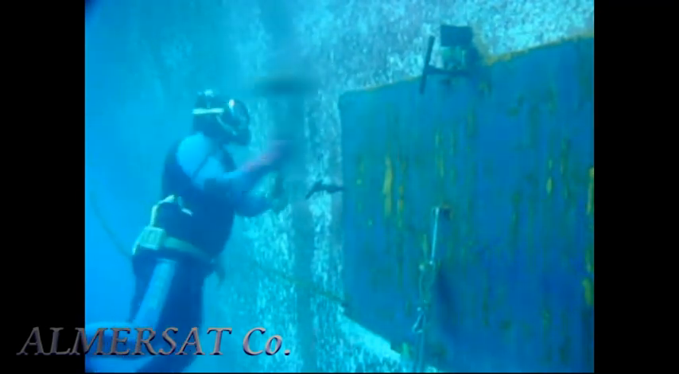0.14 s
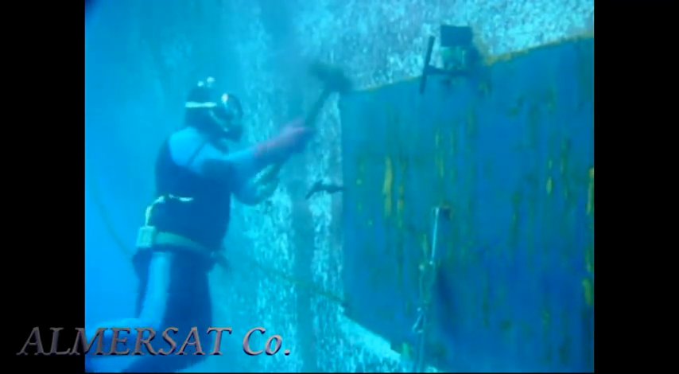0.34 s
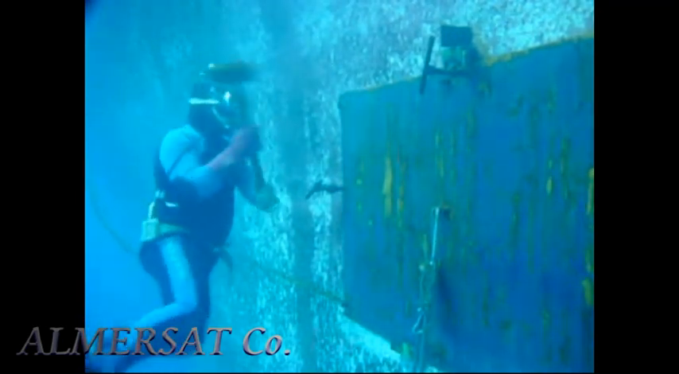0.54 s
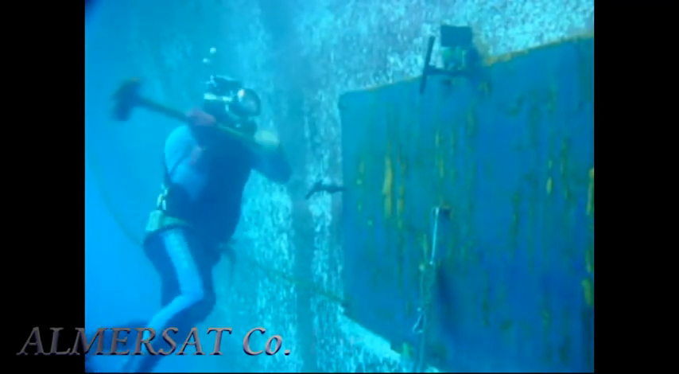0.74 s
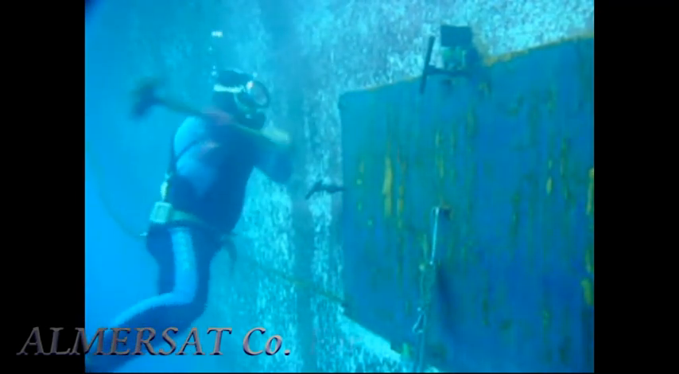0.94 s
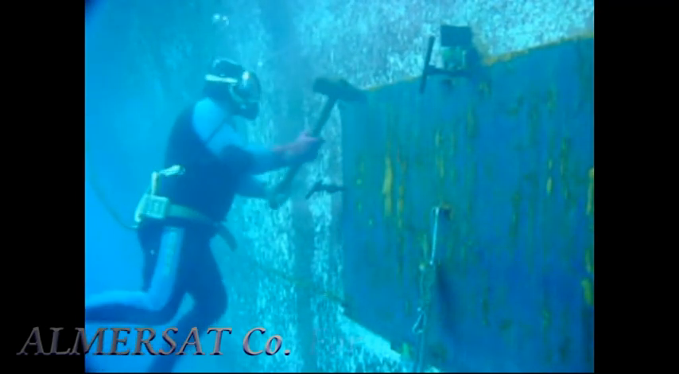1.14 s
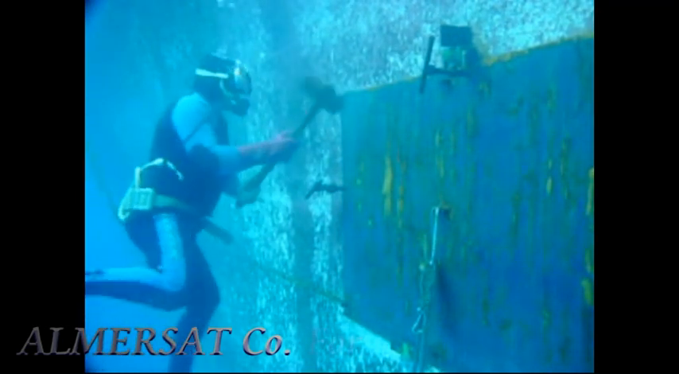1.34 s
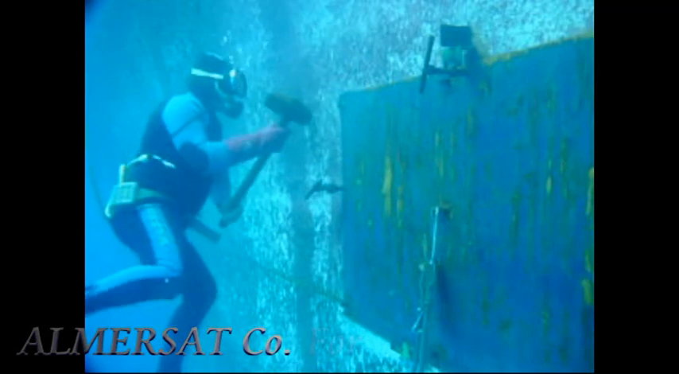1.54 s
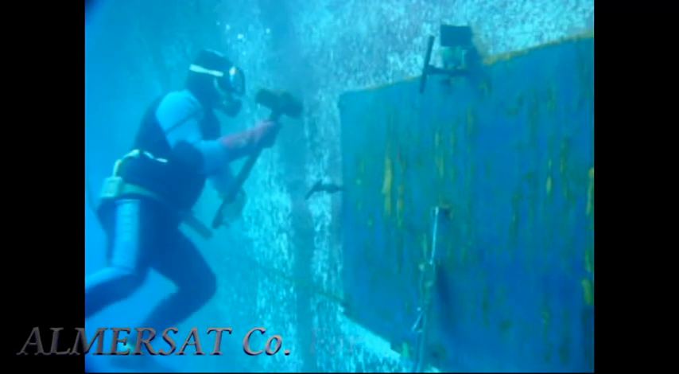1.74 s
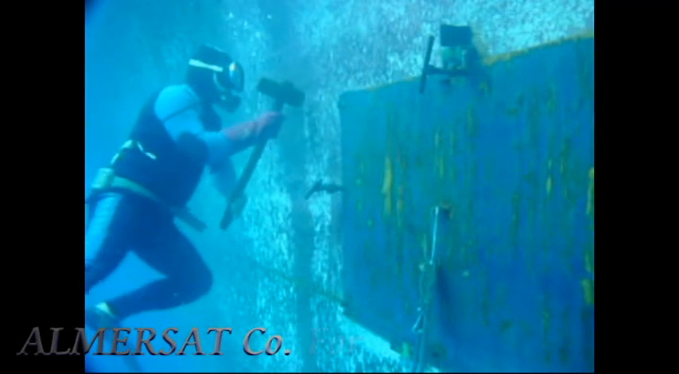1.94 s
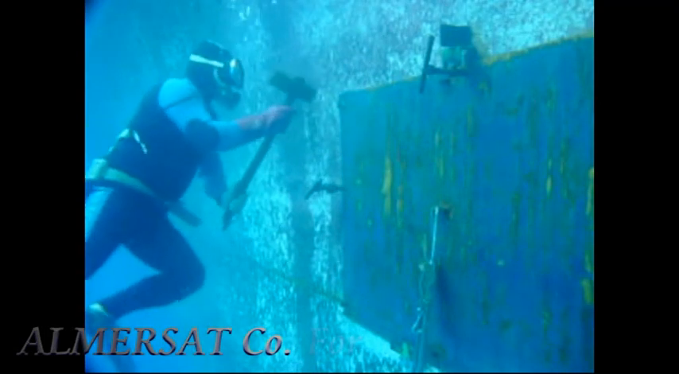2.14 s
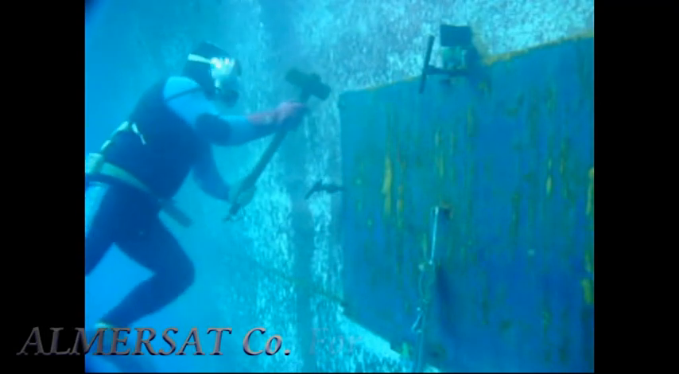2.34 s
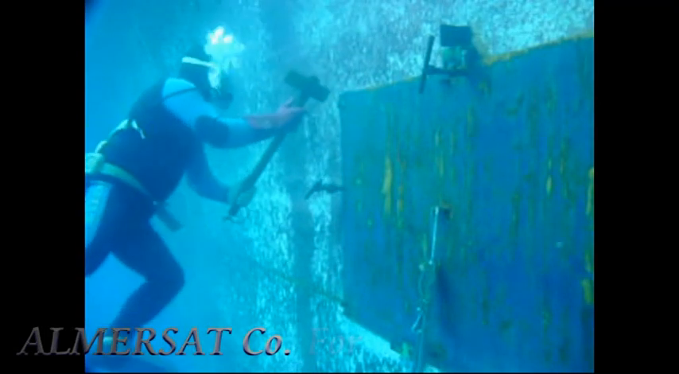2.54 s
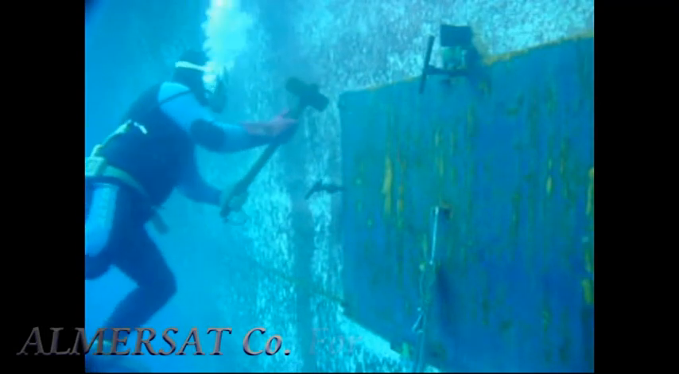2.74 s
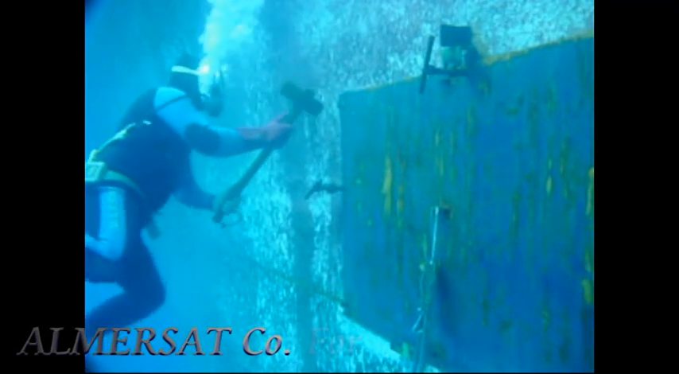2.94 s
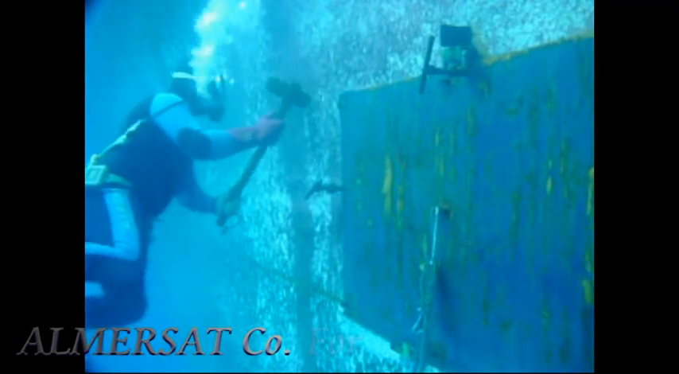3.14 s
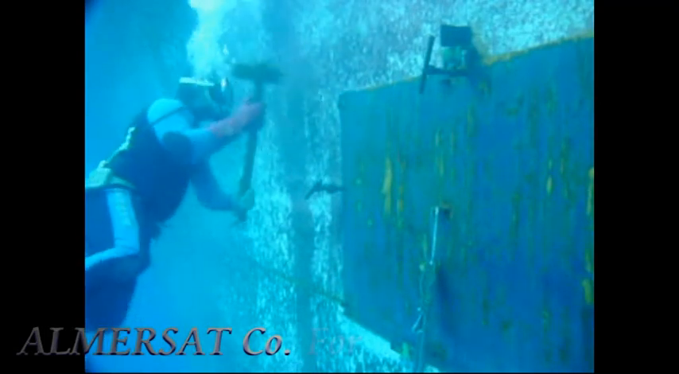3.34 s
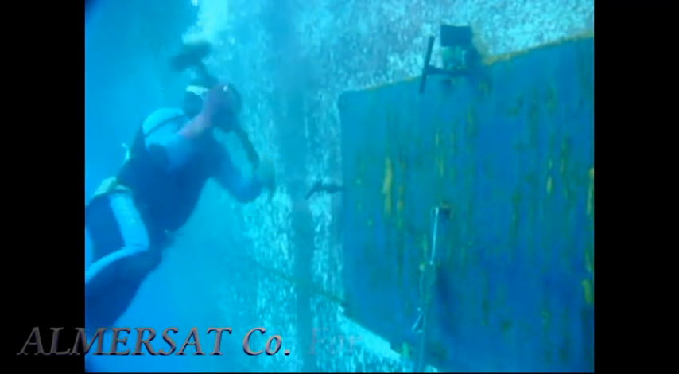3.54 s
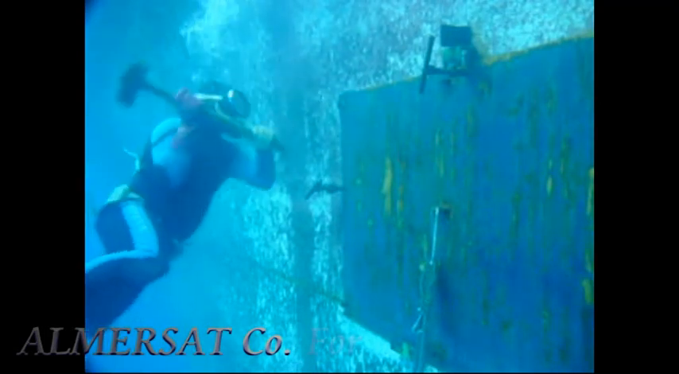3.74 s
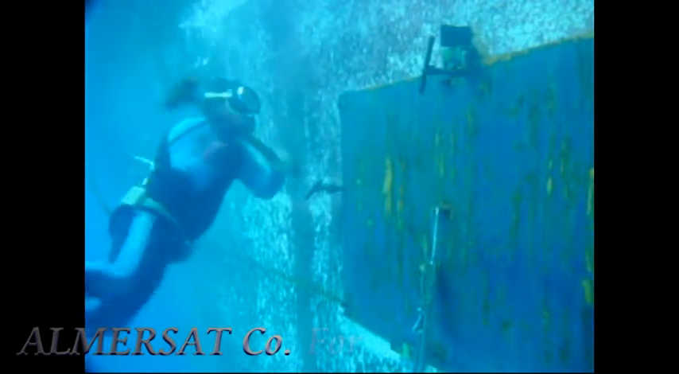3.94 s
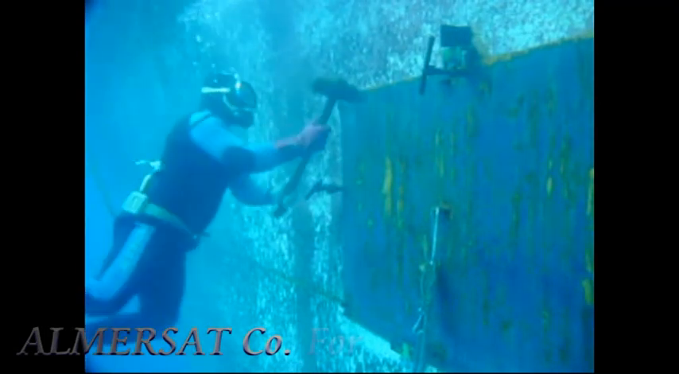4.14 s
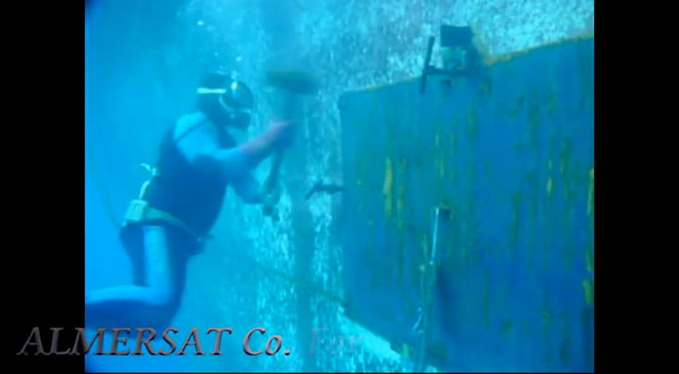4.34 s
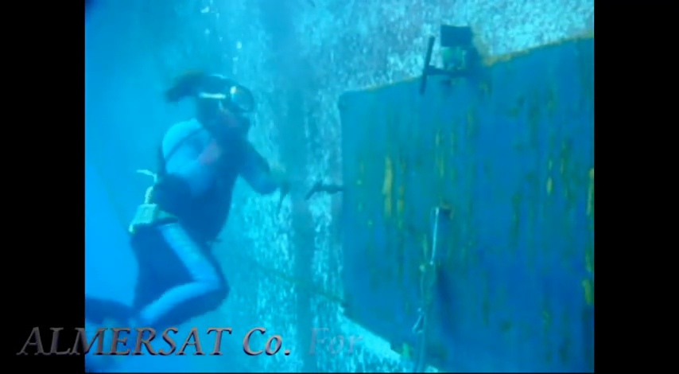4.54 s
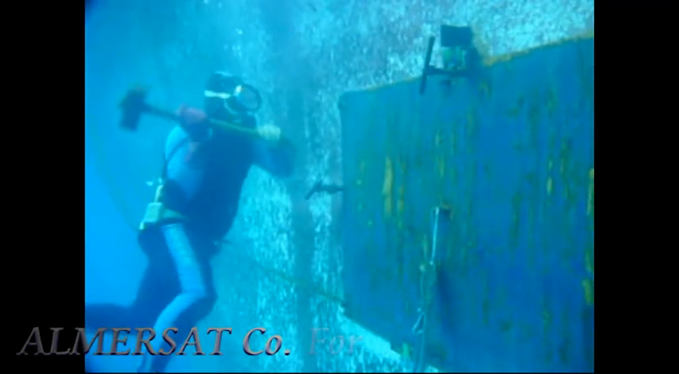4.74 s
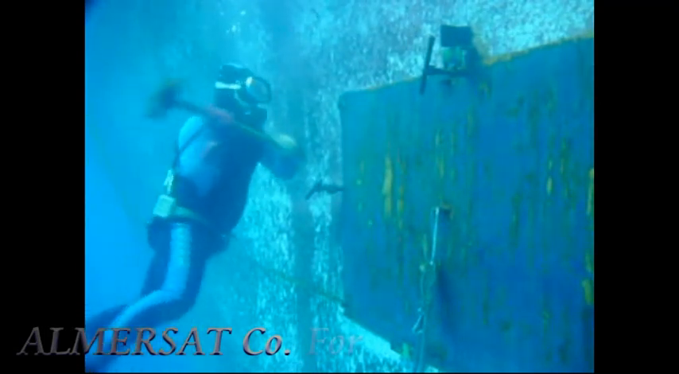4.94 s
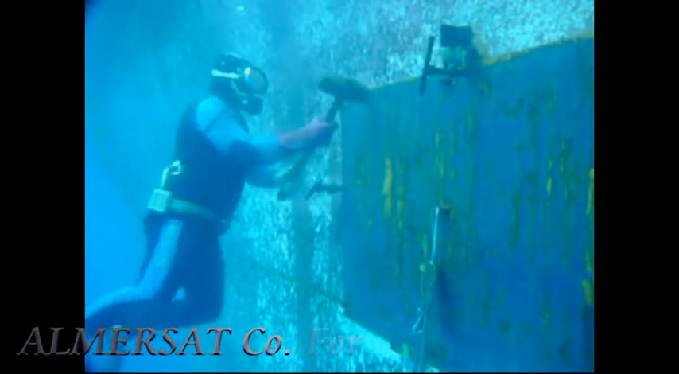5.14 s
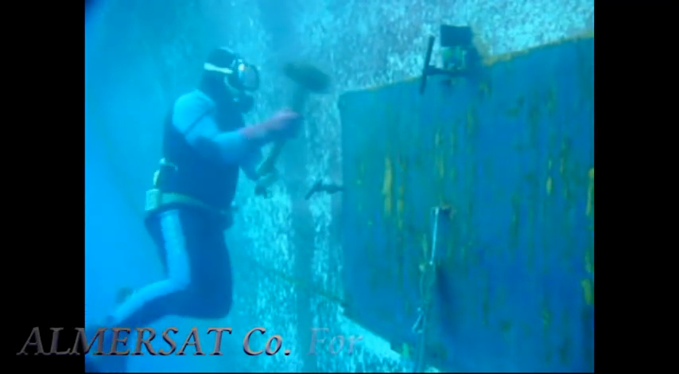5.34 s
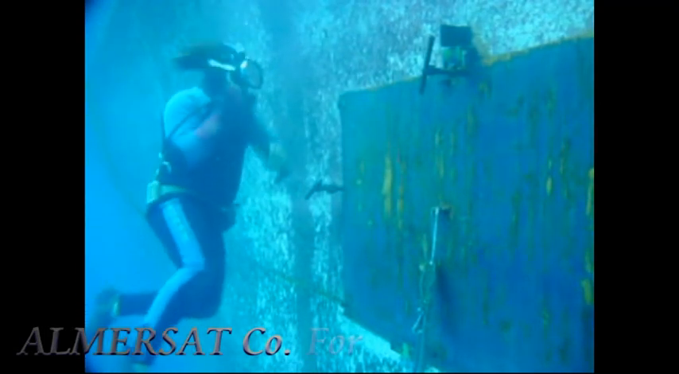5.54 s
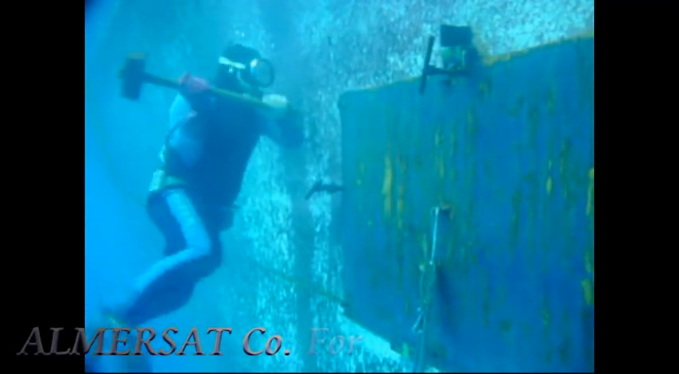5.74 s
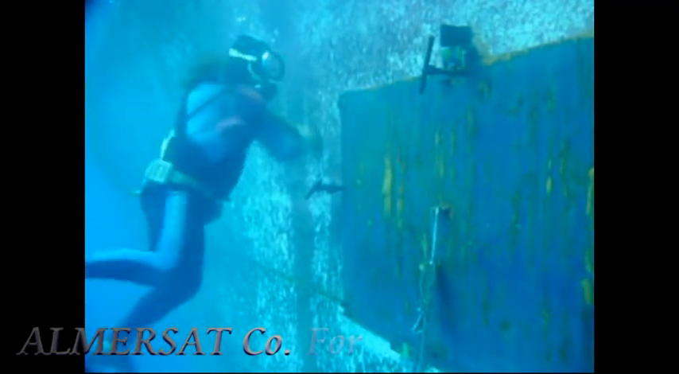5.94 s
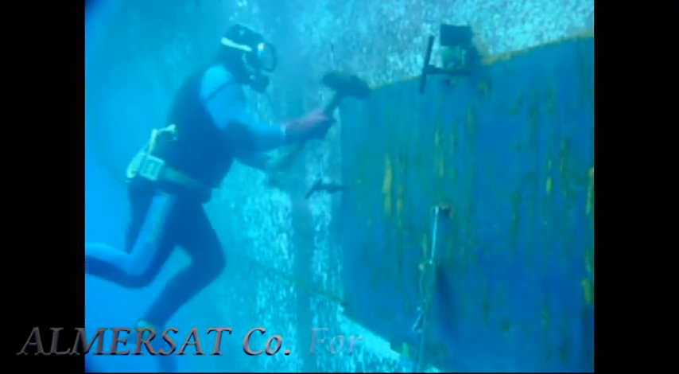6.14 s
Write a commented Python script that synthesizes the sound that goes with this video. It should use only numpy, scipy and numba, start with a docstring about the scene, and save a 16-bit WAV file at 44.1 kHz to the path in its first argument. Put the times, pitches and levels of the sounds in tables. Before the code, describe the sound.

A steady watery rush with small ringing bubbles is broken by five violent hammer blows on submerged steel: two early, then after a long gap three in quick succession. Each distorts into a harsh crack, then a muffled metallic ring and hull boom fade over a second or two. Faint little ticks come in between. The sound is close, narrow, nearly mono and boxed in by a camera housing.

```python
"""Under water at a ship's hull, a diver swings a sledgehammer five times against a steel plate over a rush of water.
Each blow sums a low push, a noisy contact crack, decaying plate modes, a high shimmer and the hull's noisy boom.
The rush is shaped noise, ringing bubbles and faint tones; two small ticks are short noise bursts.
Noises take the colour of a watertight housing. The blows overload the input until the gain control ducks;
as the boom dies, the gain and the rush come back."""
import sys
import numpy as np
from scipy import signal
from scipy.fft import rfft, irfft, next_fast_len
from scipy.io import wavfile
from scipy.ndimage import uniform_filter1d, map_coordinates
from numba import njit

SR = 44100
rng = np.random.default_rng(int(sys.argv[2]) if len(sys.argv) > 2 else 0)


def master_out(mix):
    """Clip the mix to full scale and print it as 16-bit PCM to the path in sys.argv[1]."""
    frames = np.transpose(np.atleast_2d(mix))
    ceiling = np.clip(frames, -1, 1)
    pcm = np.round(ceiling * 32767).astype(np.int16)
    wavfile.write(sys.argv[1], SR, pcm)


N = 277389


def amp(db):
    """Level law: decibels to an amplitude factor."""
    return 10 ** (np.asarray(db) / 20)


def unit(x):
    """Power normalisation: x scaled to rms 1."""
    return x / np.sqrt(np.mean(x ** 2) + 1e-20)


def along(points, hz):
    """Logarithmic frequency scale: (Hz, value) points interpolated on a log axis."""
    point_hz, value = np.transpose(points)
    return np.interp(np.log(hz + 1), np.log(point_hz + 1), value)


def wobble(rate):
    """Band-limited random modulation: a smooth curve through rate random knots a second."""
    knots = rng.standard_normal(N // 8)
    return map_coordinates(knots, [np.arange(N) * rate / SR], mode="wrap")


def filtered(x, response):
    """Linear filtering: the spectrum of x times a response of frequency."""
    m = next_fast_len(N + SR // 2)
    hz = np.fft.rfftfreq(m, 1 / SR)
    return irfft(rfft(x, m) * response(hz), m)[..., :N]


def housed_noise(spectrum):
    """Source and filter: noise of a given spectrum, coloured by the housing's resonances, at rms 1."""
    # Resonances and hollows of the housing.
    # Each row: centre in Hz, half-width in Hz, gain at the centre in dB.
    resonances = [(399.4, 13.4, 4), (535, 28.5, 5.5), (638, 18, -9.5), (747.5, 15, 3), (1285, 12, 6.5),
                  (1719, 48, -9), (2014, 27.4, 8.5), (2447, 74, 7.5), (3416, 52, 11), (3635, 71, 10),
                  (4450, 96, 8), (5060, 190, -7), (5480, 30, 8.5), (5890, 12, 11)]

    def response(hz):
        housing_db = sum(db / (1 + ((hz - centre) / width) ** 4) for centre, width, db in resonances)
        return amp(along(spectrum, hz) + housing_db)

    return unit(filtered(rng.standard_normal(N), response))


def bubbles(count=1300, centre_hz=680, spread=0.178, cycles=11, size_db=2.5, glide=0.04):
    """Bubble resonance: scattered bubbles of many sizes ring for a few cycles as their pitch rises; rms 1."""
    t = np.arange(SR // 20) / SR
    when, pitch, size = rng.random((count, 3)).T[:, :, None]
    pitch_offset = np.log(pitch / (1 - pitch)).clip(-3, 3) / 2
    hz = centre_hz * np.exp(spread * pitch_offset)
    age = t * hz / cycles  # 1 = faded by 20 dB
    strength_db = -size_db * np.log(1 - size).clip(-4)
    onset = 1 - np.exp(-t * hz)
    envelope = amp(strength_db - 20 * age) * onset
    grains = envelope * np.sin(2 * np.pi * hz * t * (1 + glide * age))
    at = (when * N).astype(int) + np.arange(len(t))
    return unit(np.bincount(at.ravel(), grains.ravel(), minlength=N)[:N])


def water(swell_db=-0.47, flutter_db=0.6, drift=1.0, gurgle_db=-7, rush_db=-1):
    """Superposition: broadband rush, bubbles and faint phase-wavering tones share one slowly growing level."""
    # Spectrum of the rush. Each row: frequency in Hz, density in dB per Hz.
    rush_spectrum = [(30, -47), (100, -37.5), (210, -30.5), (320, -11.5), (500, -8.5), (760, -1.5),
                     (900, -12), (1050, -16), (1500, -15), (1900, -21.5), (2900, -34), (4500, -34.5),
                     (5500, -36), (7400, -24)]
    # Faint tones in the rush. Each row: frequency in Hz, level in dB over the flow.
    tones = [(905, -16), (1282, -31)]
    start_db, rise_db_per_s = -19, 1.28
    t = np.arange(N) / SR
    flow_db = start_db + rise_db_per_s * t + swell_db * wobble(5.5) + flutter_db * wobble(45)
    hum = 0
    for hz, db in tones:
        phase = 2 * np.pi * hz * t + drift * wobble(9)  # drift in radians
        hum = hum + amp(db) * np.sqrt(2) * np.sin(phase)  # root two: sine of rms 1
    rush = amp(rush_db) * housed_noise(rush_spectrum)
    gurgle = amp(gurgle_db) * bubbles()
    return amp(flow_db) * (rush + gurgle + hum)


def ticks(t60=0.075):
    """Exponential decay: faint, bright little knocks, each a noise burst losing 60 dB in t60 seconds."""
    # Each row: start in seconds, level in dB.
    knocks = [(2.045, -25.5), (5.729, -22)]
    # Spectrum of a knock. Each row: frequency in Hz, density in dB per Hz.
    knock_spectrum = [(800, -16), (3500, 2), (5000, 1), (7400, -19)]
    t = np.arange(N) / SR
    envelope = sum((t >= s) * amp(db - 60 * np.abs(t - s) / t60) for s, db in knocks)
    return envelope * housed_noise(knock_spectrum)


def dying(x, decay):
    """Frequency-dependent damping: each frequency of x fades with its own decay time."""
    hz, t, z = signal.stft(x, SR, nperseg=1024)
    t60 = along(decay, hz)[:, None]
    return signal.istft(z * amp(-60 * t / t60), SR, nperseg=1024)[1][:N]


def plate(favoured_hz, lift_db, scatter_db=0.96, waver=0.58):
    """Modal superposition: damped modes of scattered strength; the water loading makes each waver in phase."""
    # Modes of the plate. Each row: frequency in Hz, relative level in dB, 60 dB decay time in seconds.
    modes = [(145.6, -23.5, 3.93), (248, -5.5, 1.85), (278.5, -12.5, 2.45), (325.5, -11.5, 3),
             (439, -10, 2.8), (535, -19, 3.46), (638, -4.5, 2.22), (668, 10, 0.88), (701, 20.5, 0.4),
             (817, -15.5, 3.1), (904, -2, 0.98), (1360, -15, 0.55), (1526, -12, 1.24)]
    t = np.arange(7 * SR // 2) / SR
    knots = np.arange(43) / 12  # twelve phase knots a second
    ring = np.zeros(len(t))
    favoured = np.argmin([abs(mode[0] - favoured_hz) for mode in modes])
    for k, (hz, db, t60) in enumerate(modes):
        start_phase = rng.uniform(0, 2 * np.pi)
        phase = start_phase + waver * np.interp(t, knots, rng.standard_normal(len(knots)))
        level_db = db + scatter_db * rng.standard_normal() + lift_db * (k == favoured)
        ring += amp(level_db - 60 * t / t60) * np.sin(2 * np.pi * hz * t + phase)
    return np.pad(ring, (0, N - len(t)))


def whole_plate_push(t, rise, hz=230, level_db=34, t60=0.066):
    """Rigid-body motion: the plate first moves as a whole, in a low, quickly damped oscillation."""
    push = -amp(level_db - 60 * t / t60) * np.sin(2 * np.pi * hz * t)
    return push * np.minimum(t / rise, 1)


def hammer(crack_level_db=53, ring_level_db=5.5, boom_level_db=10.5, fizz_t60=1.0, rise_db=70, rise=0.00342):
    """Impact excitation: each blow drives a push, a broad crack, the plate's ring and shimmer and the hull's boom."""
    # Hammer blows; the spot struck favours one mode.
    # Each row: start in seconds, force in dB, relative crack level in dB, favoured mode in Hz,
    # lift of that mode in dB, relative shimmer level in dB.
    blows = [(.2435, -3, 3.5, 638, 3, 7.5), (1.173, -5, -6, 638, 7, 5), (4.151, -1, -1.5, 904, 6.5, 1),
             (5.1335, 1, -2, 535, 7, 6), (6.087, 1.5, -3.5, 904, 4, 5.5)]
    # Spectra of contact, hull boom and plate shimmer. Each row: frequency in Hz, density in dB per Hz.
    crack_spectrum = [(30, -27), (110, -5), (280, 2.5), (500, -3.5), (700, 3), (950, -7), (1400, -5),
                      (2500, -17.5), (4000, -28), (7000, -36.5)]
    hull_spectrum = [(30, -38), (80, -19.5), (170, -16.5), (250, -6), (400, -6.5), (550, -4.5), (720, 0.5),
                     (850, -10.5), (1000, -26.5), (1450, -9.5), (1800, -36), (3000, -83), (7000, -38)]
    fizz_spectrum = [(500, -40), (1300, 0.5), (2400, -5), (4000, -17.5), (7000, -3.5)]
    # Damping of contact and hull. Each row: frequency in Hz, 60 dB decay time in seconds.
    crack_decay = [(100, 0.12), (400, 0.13), (700, 0.15), (1100, 0.12), (7000, 0.15)]
    hull_decay = [(100, 2.55), (260, 2.12), (700, 1.79), (1500, 0.96), (6000, 0.88)]
    out, t = np.zeros(N), np.arange(N) / SR
    contact = housed_noise(crack_spectrum)
    hull = housed_noise(hull_spectrum)
    shimmer = housed_noise(fizz_spectrum)
    push = whole_plate_push(t, rise)
    swell = amp(-rise_db * np.exp(-t / rise))  # the bending waves need a few ms to fill the plate
    for s, force_db, crack_db, favoured_hz, lift_db, fizz_db in blows:
        start = round(s * SR)
        # rolling the noise gives each blow a different stretch of it
        crack = amp(crack_level_db + crack_db) * dying(np.roll(contact, -start), crack_decay)
        boom = amp(boom_level_db) * dying(np.roll(hull, -start), hull_decay)
        ring = amp(ring_level_db) * plate(favoured_hz, lift_db)
        fizz = amp(fizz_db - 60 * t / fizz_t60) * np.roll(shimmer, -start)
        blow = push + swell * (crack + ring + boom + fizz)
        out[start:] += amp(force_db) * blow[:N - start]
    return out


def scene():
    """Linear superposition: both channels hear the same sum inside the housing."""
    return np.tile(hammer() + water() + ticks(), (2, 1))


@njit
def gain_control(x, target, ceiling, attack, release, window):
    """Feedback level control: gain falls while the clipped output's rms exceeds target and recovers below it."""
    # attack and release: dB a second per unit of relative excess; window: power averaging in samples
    out, gain_db, power = np.zeros(len(x)), 0.0, 0.0
    for i in range(len(x)):
        out[i] = x[i] * 10 ** (gain_db / 20)
        power += (min(abs(out[i]), ceiling) ** 2 - power) / window
        excess = np.sqrt(power) / target - 1
        speed = attack if excess > 0 else release
        gain_db = min(0.0, gain_db - excess * speed / SR)
    return out


def overload(x, ceiling, bias=0.313, ragged_db=5, sag_db=8.0):
    """Asymmetric clipping: the overdriven input slips off centre; upper flats are ragged, lower ones sag slowly."""
    over = np.maximum(np.abs(x) - ceiling, 0)
    drive = uniform_filter1d(over, 353, origin=176)  # mean over the last 8 ms
    strain = np.abs(drive) / (np.abs(drive) + ceiling)
    upper = np.minimum(ceiling * amp(strain * ragged_db * (wobble(450) - 1.0)), 1)
    lower = ceiling * amp(-strain * sag_db * np.tanh(wobble(75)) ** 2)
    return np.clip(x - bias * drive, -lower, upper)


def record(dry):
    """Overload and spectral imaging: gain control, clipping, and a narrow-band converter with faint mirror images."""
    # Colour after the overload. Each row: frequency in Hz, gain in dB.
    input_colour = [(30, 0), (1500, -1), (3500, -3), (5000, -4.5), (6500, -14), (7400, -17.5)]
    # Converter images above the band. Each row: frequency in Hz, gain in dB.
    image_colour = [(8600, -2), (10000, -7.5), (12000, -17), (13000, -22), (14000, -31), (15300, -55)]
    # Balance of the channels. Each row: frequency in Hz, left minus right in dB.
    tilt = [(60, 0), (700, 0), (1200, -.8), (2300, -1.1), (4400, -1), (8000, -.1), (14000, -.5)]
    converter_hz, band_hz, top_hz = 16000, 7500, 15423
    ceiling, hiss_db, channel_hiss_db = .82, -58, -68.5
    levelled = gain_control(dry.mean(axis=0), amp(-15.5), ceiling, 59.5, 174.0, 0.015 * SR)
    clipped = overload(levelled, ceiling) + amp(hiss_db) * rng.standard_normal(N)
    band = filtered(clipped, lambda hz: amp(along(input_colour, hz)) * (hz < band_hz))
    # multiplying by the converter's rate reflects the band about half that rate
    mirrored = 2 * band * np.cos(2 * np.pi * converter_hz * np.arange(N) / SR)
    mono = band + filtered(mirrored, lambda hz: amp(along(image_colour, hz)))
    pair = filtered(mono, lambda hz: amp(np.outer([.5, -.5], along(tilt, hz))))
    pair = pair + amp(channel_hiss_db) * rng.standard_normal((2, N))
    return filtered(pair, lambda hz: hz < top_hz)


dry = scene()
out = record(dry)
master_out(out)
```